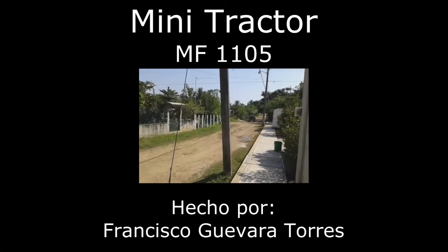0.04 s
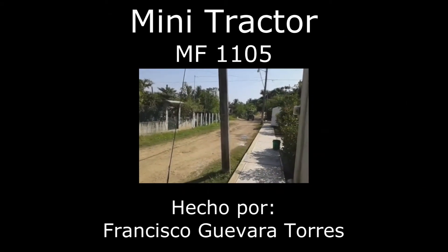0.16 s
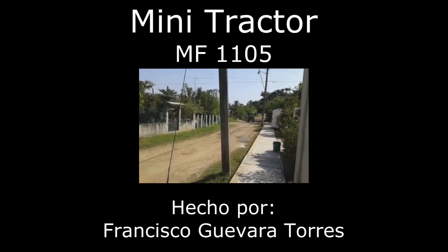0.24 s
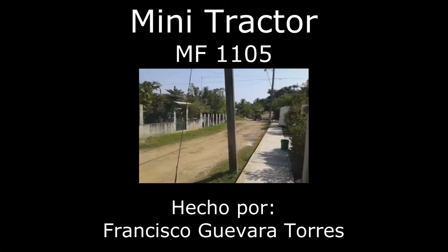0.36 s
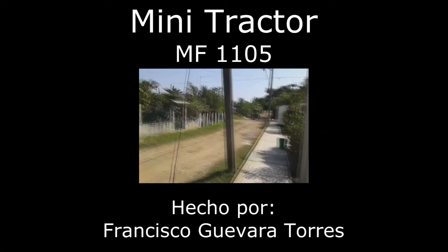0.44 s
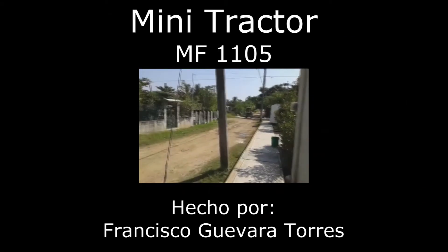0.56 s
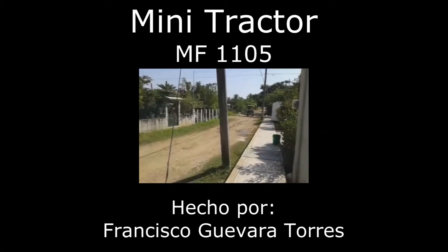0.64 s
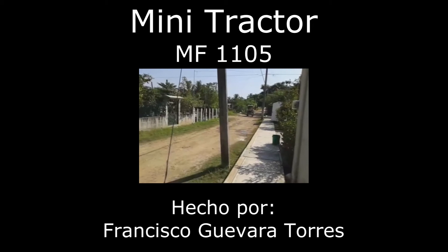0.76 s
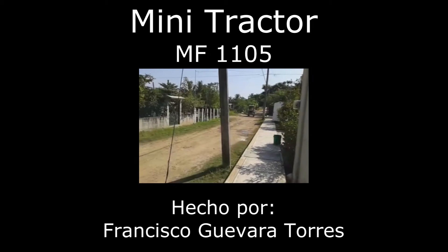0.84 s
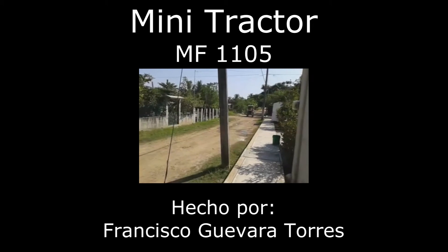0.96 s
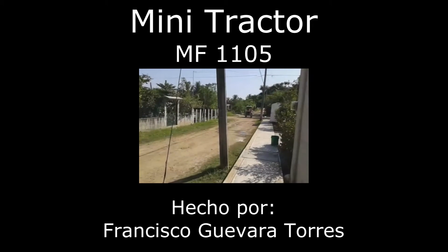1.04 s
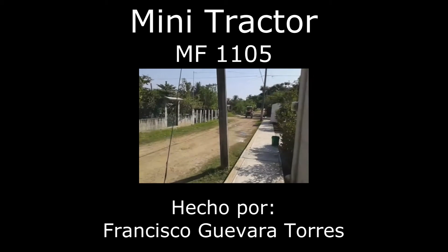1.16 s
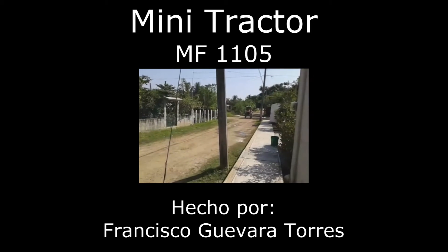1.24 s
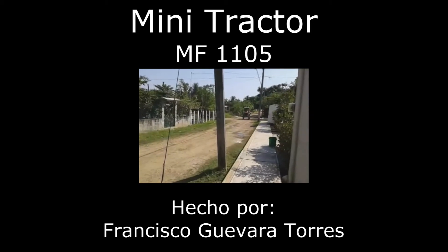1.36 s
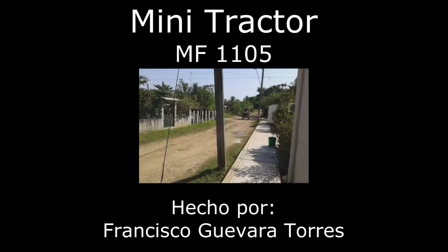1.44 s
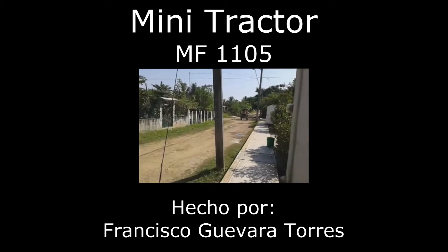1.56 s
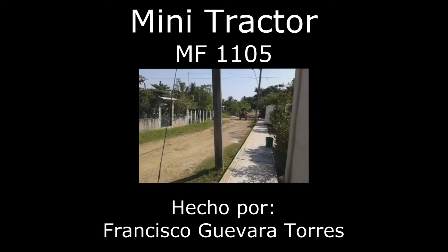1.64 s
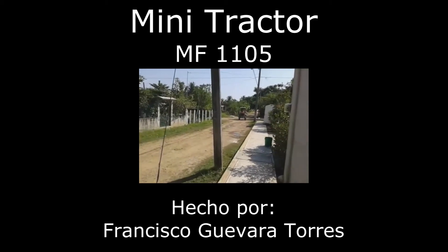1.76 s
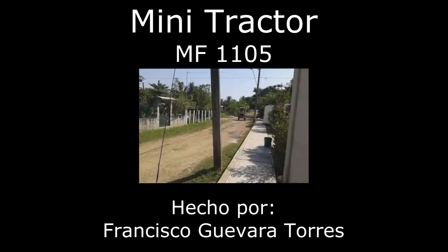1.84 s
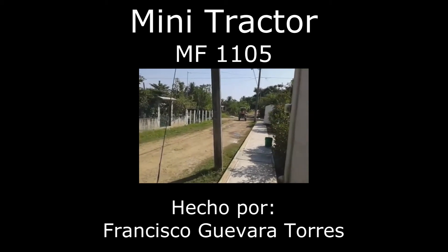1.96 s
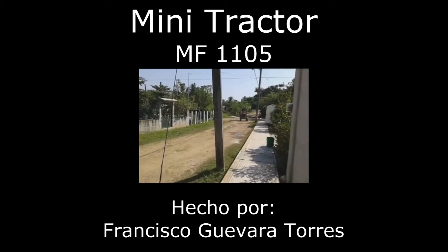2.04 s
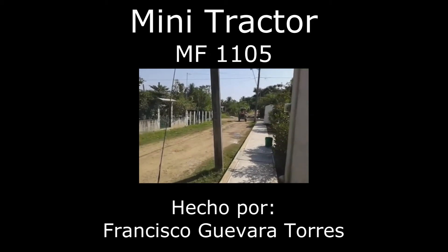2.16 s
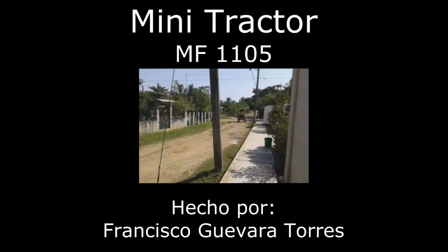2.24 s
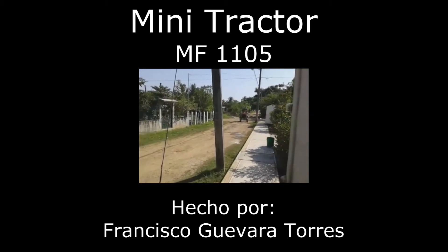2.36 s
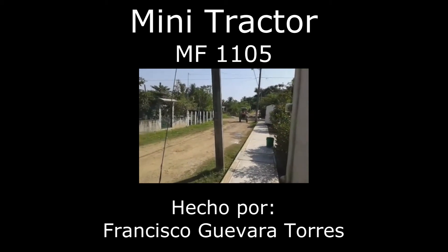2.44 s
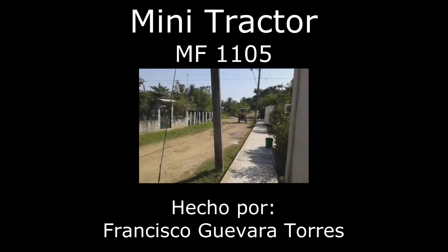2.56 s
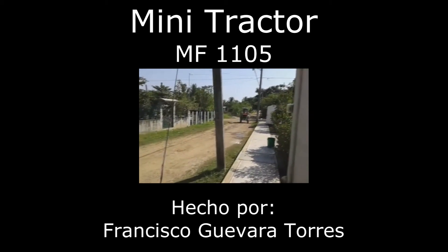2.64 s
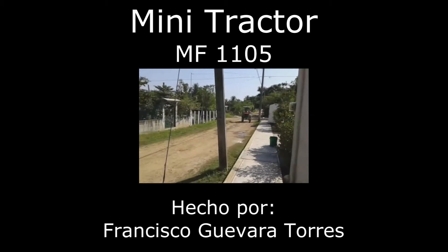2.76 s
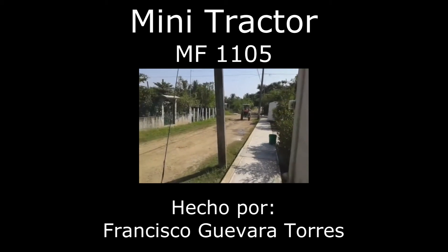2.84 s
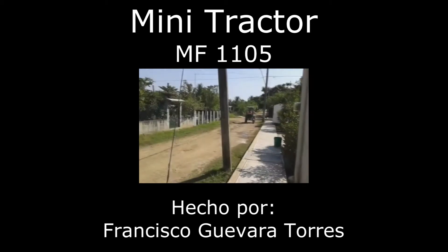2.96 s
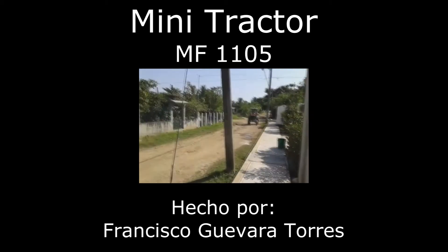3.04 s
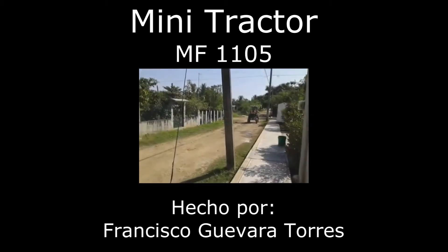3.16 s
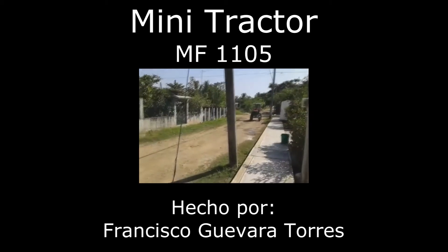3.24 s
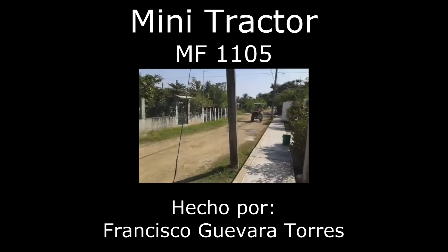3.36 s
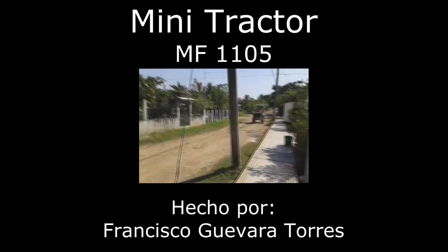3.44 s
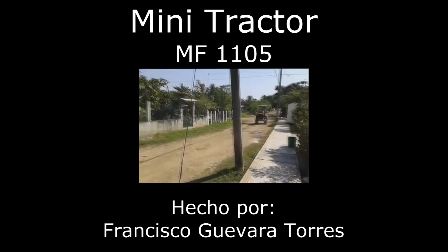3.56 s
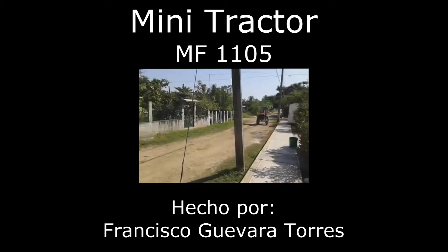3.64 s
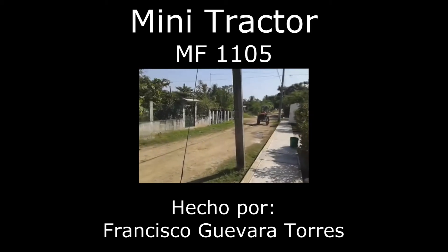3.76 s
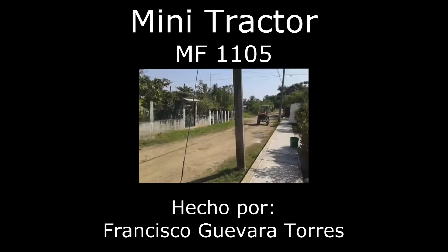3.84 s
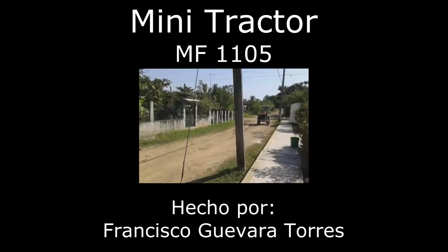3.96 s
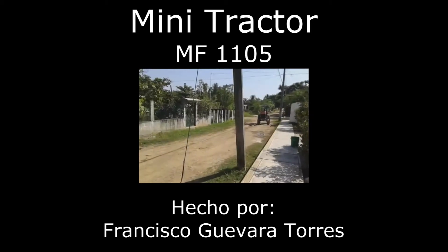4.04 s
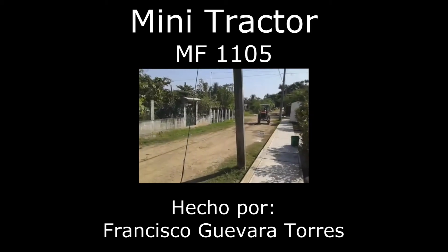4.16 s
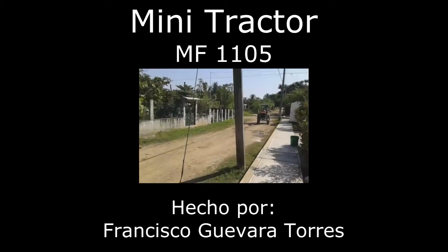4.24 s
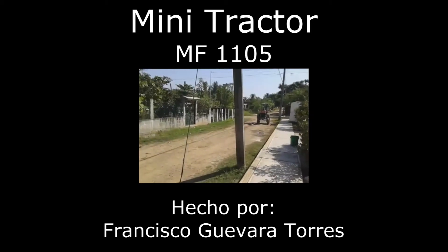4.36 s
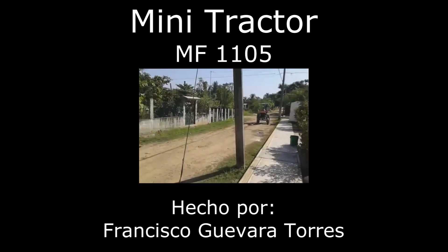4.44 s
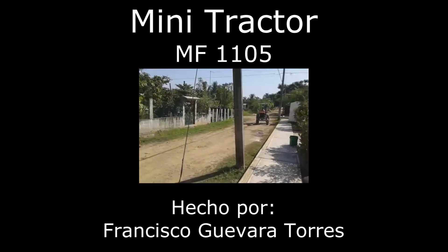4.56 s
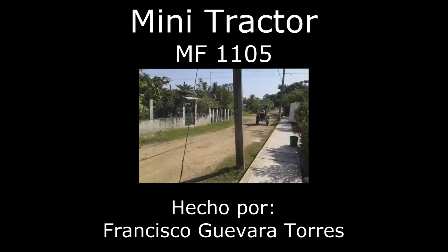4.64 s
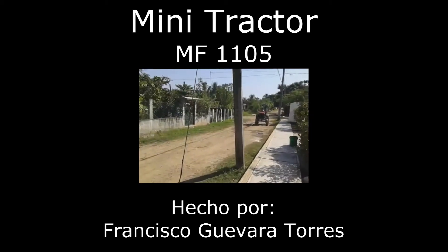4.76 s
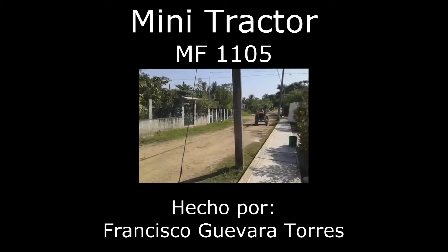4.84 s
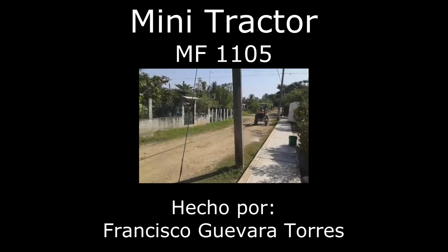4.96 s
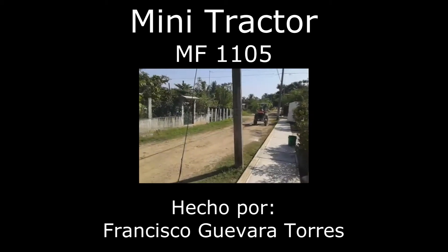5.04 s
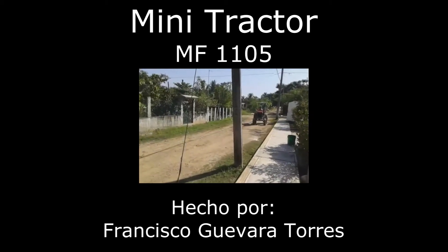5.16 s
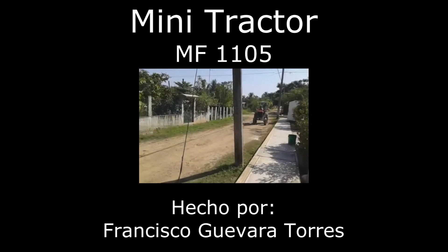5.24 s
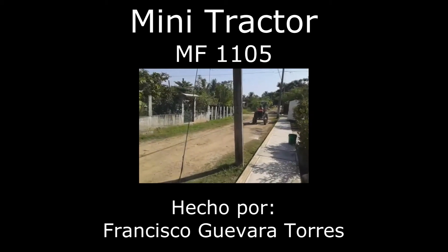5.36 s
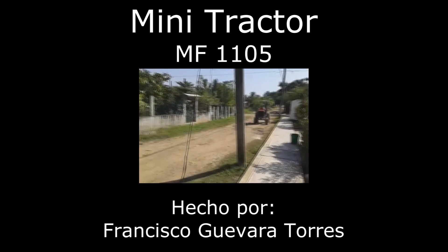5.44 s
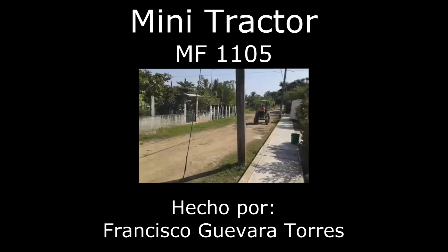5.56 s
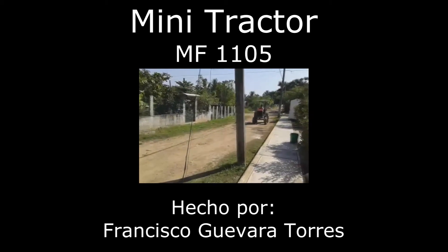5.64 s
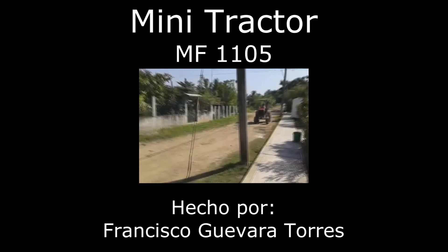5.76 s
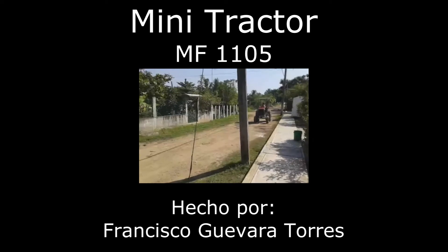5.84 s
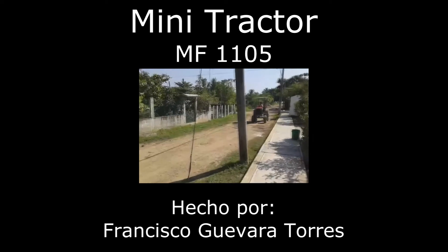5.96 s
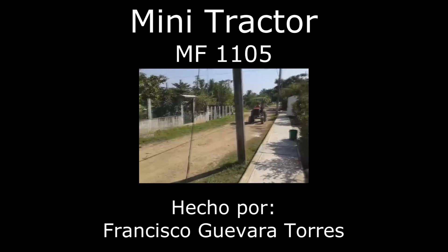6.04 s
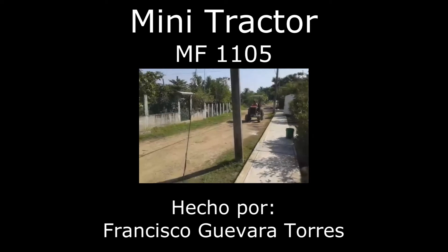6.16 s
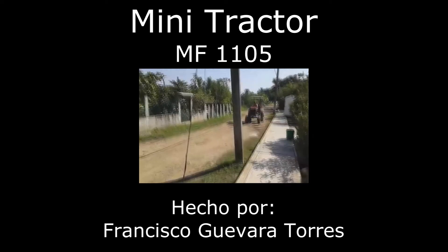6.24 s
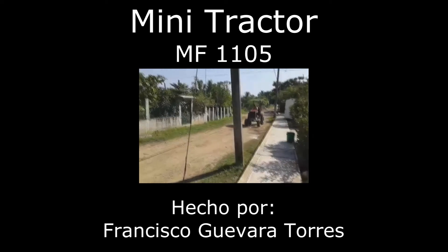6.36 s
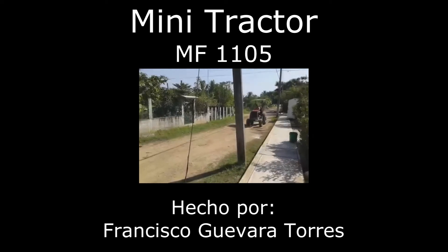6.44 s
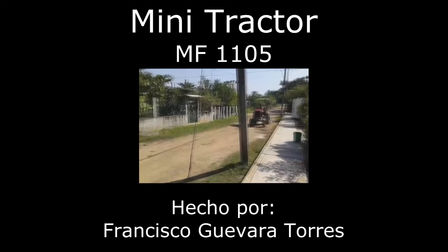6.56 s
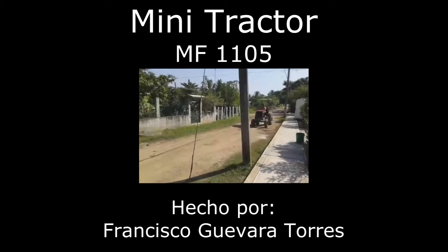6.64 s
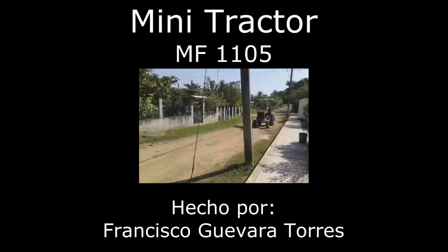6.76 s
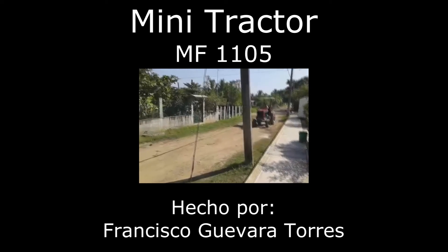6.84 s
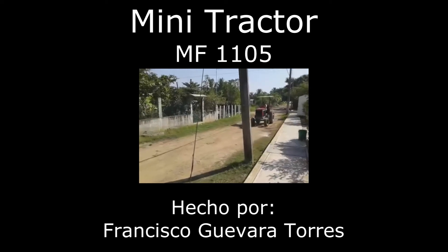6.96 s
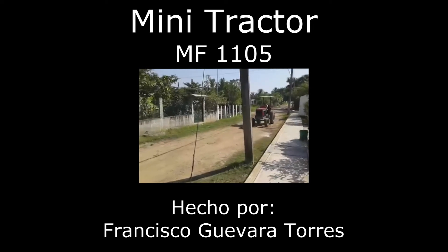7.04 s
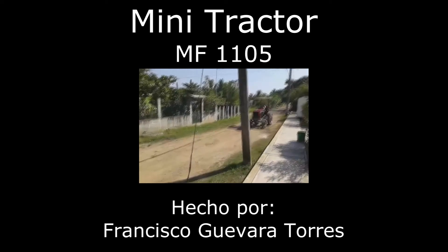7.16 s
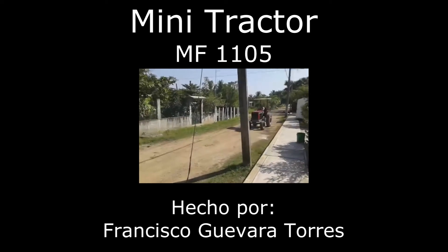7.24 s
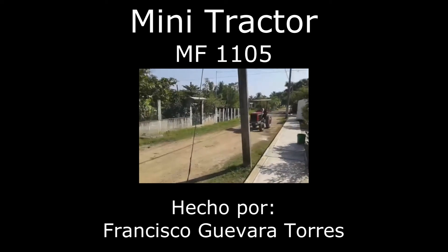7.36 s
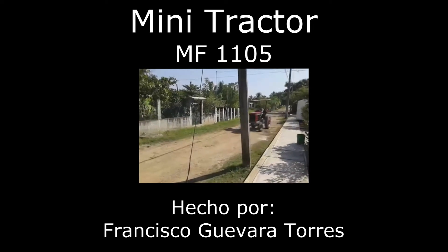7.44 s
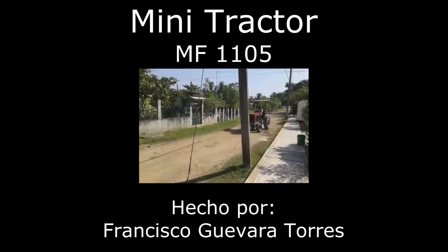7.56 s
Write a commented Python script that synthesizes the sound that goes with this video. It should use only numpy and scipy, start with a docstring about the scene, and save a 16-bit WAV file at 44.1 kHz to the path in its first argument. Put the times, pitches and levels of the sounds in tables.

```python
"""The four-cylinder car engine of a small home-built tractor, crawling up a dirt street towards us.
As the throttle wanders, the exhaust's harmonics slide through the muffler's boom and the uneven
cylinders burble; midway there is a short low thump as the engine suddenly gets louder.
The block clatters and knocks, the running gear hisses and squeals, loose metal rattles over the bumps.
Underneath, the wheels rumble on the dirt and a faint tone comes and goes."""
import sys
import numpy as np
from scipy import signal
from scipy.fft import rfft, irfft, next_fast_len
from scipy.io import wavfile
from scipy.ndimage import uniform_filter1d

SR = 44100
rng = np.random.default_rng(int(sys.argv[2]) if len(sys.argv) > 2 else 0)


def log_audio(samples):
    """Write samples as a 16-bit WAV file to the path given in sys.argv[1]."""
    # one column per channel
    frames = np.atleast_2d(samples).T
    # limit to full scale, then quantise
    limited = np.clip(frames, -1, 1)
    pcm = np.round(limited * 32767).astype(np.int16)
    wavfile.write(sys.argv[1], SR, pcm)


N = 335160
TIME = np.arange(N) / SR
CRUISE_HZ, MIDDLE_REVS_HZ, HIGH_REVS_HZ = 40, 45.5, 49.5  # firing rates
LOAD_START_S, LOAD_RISE_S = 3.39, 0.043
FAR_M, NEAR_M = 31.4, 16.7  # the colour crossfades from far to near between these distances

# The tractor's approach. Each row: time in seconds, distance in metres.
APPROACH = [(0, 41.7), (1.6, 43.3), (3, 29.6), (5, 26.6), (6.4, 19.9), (7.6, 20.6)]
# Wheels on dirt. Each row: frequency in Hz, relative level in dB.
RUMBLE_EQ = [(20, -30.5), (45, 0), (80, 17), (200, -5), (1000, -64)]
# Swells of the faint tone. Each row: centre in seconds, half length in seconds, level in dB.
TONE_SWELLS = [(2.8, 0.11, -52), (3.85, 0.09, -49)]
# Bumps that shake loose metal. Each row: start in seconds, relative rattle level in dB,
# rattle decay in seconds, crack level in dB.
BUMPS = [(0.027, -57, 0.03, -67), (0.137, -52.5, 0.0085, -69), (.273, -57, 0.014, -68),
         (.48, -56, 0.026, -65), (.606, -59, .01, -72), (1.05, -54, 0.023, -68), (1.168, -52.5, 0.015, -66),
         (1.259, -50.5, 0.017, -64), (1.331, -54, 0.015, -68), (1.74, -55, 0.016, -70),
         (1.879, -55, 0.015, -68), (2.339, -55, 0.021, -64), (2.435, -54, 0.018, -65),
         (2.565, -56, .015, -69), (2.646, -53, 0.016, -63), (4.139, -49, 0.06, -55),
         (5.726, -43.5, 0.043, -62), (5.83, -44, 0.017, -60), (5.847, -40.5, 0.024, -48),
         (6.162, -43, .03, -62), (6.225, -49, 0.17, -62), (6.318, -44, 0.018, -53),
         (6.677, -58, 0.018, -63), (6.771, -44.5, 0.023, -50), (6.89, -51, .25, -62),
         (6.972, -47, 0.022, -56), (7.057, -42, 0.011, -54), (7.092, -44.5, 0.086, -43),
         (7.205, -47.5, 0.16, -53), (7.367, -49, 0.013, -55), (7.523, -41.5, 0.043, -41.5)]
# Colour of the rattle and of its opening crack. Each row: frequency in Hz, relative level in dB.
RATTLE_EQ = [(600, -12.5), (1500, -5.5), (2800, -16), (3500, -6), (4000, -3.5), (4600, 1.5), (5300, 5.5),
             (6500, -6), (8000, -17), (11000, -23), (14000, -34)]
CRACK_EQ = [(2500, -15), (4500, 0), (8000, 4), (10500, -1.5), (14000, -9)]
# Ring of thin steel parts. Each row: frequency in Hz, width in Hz, relative level in dB.
STEEL_MODES = [(2427, 30, -24), (2840, 35, -23.5), (3594, 33, -19), (3935, 35, -14), (4090, 35, -17.5),
               (4320, 98, -14.5), (5100, 80, -12), (5465, 240, -8.5)]
# Notes of rubbing metal. Each row: centre in seconds, half length in seconds, pitch in Hz,
# pitch scatter in Hz, level in dB.
SQUEALS = [(3.45, 0.076, 5460, 130, -59), (3.6, 0.065, 5160, 90, -54), (3.73, 0.095, 5520, 80.3, -53),
           (3.76, .08, 4400, 80, -57), (3.9, 0.096, 5550, 139.7, -51.5), (3.99, 0.08, 4340, 111, -54.5),
           (4.13, .09, 4430, 90, -53.5), (4.14, 0.072, 5600, 119.6, -54), (4.75, 0.35, 3905, 70, -58.5),
           (5.42, 0.07, 4380, 100, -52), (6.037, .05, 5400, 110, -57), (6.33, 0.13, 5240, 303, -48),
           (6.56, .07, 5470, 111.6, -58)]
# Gear hiss and block clatter, from afar (the ground cancels 1 kHz) and close by.
# Each row: frequency in Hz, relative level in dB.
GEAR_FAR_EQ = [(1600, -35), (2700, -17), (3200, -10), (3530, -4), (3700, -7.5), (3970, 1), (4650, -5),
               (4950, -4.5), (5170, -5), (5700, -4), (6300, -9.5), (7000, -15), (8500, -23.5),
               (14000, -29.5)]
GEAR_NEAR_EQ = [(1600, -33), (2700, -13), (3600, -8), (3950, -7), (4350, 2), (4620, 0), (5100, 5.5),
                (5450, 2.5), (5950, 1.5), (6250, -5.5), (7000, -13), (8500, -20), (14000, -30.5)]
BLOCK_FAR_EQ = [(200, -14), (320, -5.5), (420, -5.5), (530, -5), (600, 1.5), (665, -4), (740, -0.5),
                (850, -1), (930, -7.5), (1050, -16), (1200, -8), (1400, -18), (2000, -45.5)]
BLOCK_NEAR_EQ = [(200, -20), (330, 6.5), (410, -0.5), (460, -0.5), (520, 2), (590, 1.5), (680, -1),
                 (750, -5), (860, -6), (1000, -7), (1200, -9.5), (1400, -27.5), (2000, -34.5)]
# The valve gear's bright edge. Each row: frequency in Hz, relative level in dB.
VALVE_EQ = [(600, -18), (1050, -5.5), (1200, -4), (1350, -1), (1700, 2), (1820, 1.5), (1920, 4.5),
            (2060, -0.5), (2280, -3), (2650, -5.5), (3400, -8), (5000, -19), (9000, -57)]
# Engine bay panels. Each row: frequency in Hz, width in Hz, relative level in dB, change close by in dB.
PANEL_MODES = [(369.7, 16, -12, 4), (461, 35, -12.5, 3), (735, 18, -7.5, -2.5), (782, 33, -15, 5.5),
               (847, 45, -11.5, -5.5), (1148, 55, -17, -3.5), (1233, 55, -17.5, 2)]
# Hard firings. Each row: centre in seconds, half length in seconds, resonance in Hz, level in dB.
HARD_FIRINGS = [(3.52, 0.0068, 830, -46), (3.812, 0.014, 810, -52), (3.891, .015, 820, -47),
                (4.003, .012, 480, -45), (4.061, 0.021, 1230, -50), (4.152, .025, 830, -53),
                (4.168, .012, 520, -46.5), (4.238, .012, 480, -45), (4.306, 0.025, 765, -44.5),
                (4.319, 0.019, 477, -44), (4.405, .012, 500, -43), (5.805, 0.011, 580, -43),
                (5.965, .006, 650, -44), (6.177, 0.036, 774, -47), (6.263, 0.02, 790, -45),
                (6.346, .009, 776, -40.5), (6.53, .013, 484, -42), (6.612, 0.012, 475, -42),
                (6.698, 0.0086, 556.6, -47), (6.933, .01, 520, -40), (7.012, .012, 460, -43),
                (7.246, .025, 707, -46.5), (7.326, .015, 1230, -48), (7.444, 0.01, 520, -42.5),
                (7.525, 0.012, 480, -41)]
# The thump's resonances. Each row: frequency in Hz, width in Hz, relative level in dB per pass.
THUMP_MODES = [(201, 31, 3.5), (611, 29, -24), (850, 30, -27)]
# Cylinders in firing order. Each row: exhaust pulse strength, lateness in firing periods, knock strength.
CYLINDERS = [(1.23, -0.014, 1.1), (0.72, 0.028, 0.15), (1.18, 0.116, 0.3), (0.7, -0.131, 0.6)]
# The wandering revs. Each row: time in seconds, firings per second.
REVS = [(0, 29.7), (.1, 32.9), (.3, 45.6), (.4, 47.8), (.6, 44.4), (.9, 37.6), (1, 32.9), (1.3, 37.8),
        (1.5, 39.2), (1.62, 36.6), (1.85, 36.5), (2, 39.8), (2.25, 38.1), (2.52, 38.8), (2.75, 46.5),
        (3.08, 45.9), (3.3, 37.8), (3.45, 36.5), (3.7, 43.3), (3.95, 47.3), (4.15, 49.4), (4.3, 50.7),
        (4.5, 47.7), (4.75, 40.9), (5.5, 38.9), (5.85, 36), (6.02, 38.2), (6.5, 49.9), (6.85, 50.2),
        (7.2, 44.9), (7.52, 49.9)]
# The exhaust's effort, stepping up as the throttle opens. Each row: time in seconds, level in dB.
EXHAUST_EFFORT = [(0, -38), (.2, -37.5), (.45, -39.5), (.8, -36.5), (1.1, -38), (1.3, -35), (1.65, -37),
                  (1.95, -34), (2.6, -33), (2.85, -36.5), (3.39, -32), (3.42, -27.5), (3.48, -31),
                  (3.53, -26), (3.99, -26.5), (4.05, -30), (4.1, -26.5), (4.5, -27), (5.3, -25), (5.75, -26),
                  (6.35, -26), (6.7, -29.2), (7.15, -23.5), (7.6, -25)]
# The muffler's filtering of the burble. Each row: frequency in Hz, relative gain in dB.
MUFFLER_EQ = [(30, -73), (60, -48), (90, -9.5), (120, -2), (150, 7.5), (180, 5.5), (215, 6.5), (245, 1.5),
              (275, -12), (320, -18.5), (400, -34), (700, -63)]
# Partials from the unequal cylinders. Each row: multiple of the four-stroke cycle rate,
# then relative level in dB ahead of the muffler at cruise, at middle revs and at high revs.
BURBLE_PARTIALS = [(9, -15, -14, -7), (10, -4, -6, -0.5), (11, -19, -2, -6), (13, -5.5, -0.5, -3),
                   (14, -12.5, 2, -4.5), (15, -7.5, 1.5, -3.5), (17, -11.5, -6, -1), (18, 2.5, -0.5, -2.5),
                   (19, -1.5, -0.5, -1.5), (20, 0, -7.5, -5), (21, -10.5, -10, -2.5), (22, -8.5, -2, 3),
                   (23, -10, 0, 1.5), (24, -1.5, 1.5, 5), (25, -8.5, -1.5, 2), (26, -1.5, -15, -14),
                   (27, -6, -5, -5), (28, -6, -6, 4.5), (31, -6.5, -3, -5), (32, 2, -5, -4)]
# How ragged the burble is. Each row: time in seconds, irregular share from 0 to 1.
RAGGEDNESS = [(0, 0.22), (1.2, 0.18), (2.4, 0.29), (3.5, 0.27), (4.3, 0.18), (4.8, 0), (5.7, 0.04),
              (6.3, 0.12), (7.6, 0.11)]
# The burble's level changes with the revs, dipping as the drone's third harmonic reaches the pipe's boom. Each
# row: firings per second, relative level in dB.
BURBLE_BY_REVS = [(32, -4.5), (37, 0), (40, 0), (46, -2), (50, -1.5)]
# Exhaust partials bloom or drop out. Each row: multiple of the four-stroke cycle rate,
# centre in seconds, half length in seconds, boost or cut in dB.
PARTIAL_SWINGS = [(8, 4.05, .07, -17), (8, 4.85, 0.24, -6), (8, 6.42, 0.15, 6.5), (12, 0.42, 0.12, 5),
                  (12, 1.27, 0.11, 6.5), (12, 1.6, 0.063, -3), (12, 1.75, 0.25, 5.5), (12, 2.27, 0.21, -8),
                  (12, 2.956, 0.23, 6), (12, 3.86, 0.072, 7), (12, 4.256, 0.42, -7.5), (12, 4.81, 0.16, 2),
                  (12, 5.72, 0.46, -4.5), (12, 6.4, 0.16, -0.5), (12, 6.76, 0.21, 7),
                  (12, 7.16, 0.16, -0.5), (12, 7.52, 0.14, 3.5), (14, 4.18, 0.36, -10), (15, 4.25, .25, 1),
                  (16, 0.86, .13, 4.5), (16, 1.47, 0.084, 3.5), (16, 1.7, .1, -2), (16, 3.74, 0.28, -7),
                  (16, 4.14, .25, 3), (16, 4.7, 0.15, -2.5), (16, 7.1, 0.081, 3.5), (16, 6.47, 0.22, -3.5),
                  (16, 7.17, 0.23, -15), (18, 1.28, 0.81, -11), (19, 3.08, 0.35, -7), (20, 1.47, .4, 4),
                  (20, 2.3, .25, 4), (20, 4.7, 0.19, 5), (24, 3.38, 0.24, 8), (25, 3.45, 0.27, 7),
                  (26, 1.2, .7, -8)]
# The tailpipe, with its boom near 150 Hz. Each row: frequency in Hz, gain in dB.
PIPE_EQ = [(65, -21.5), (80, -17.5), (98, -8), (112, -10.5), (118, -11), (125, -6), (137, -1.5), (150, 1),
           (160, 1), (172, -1), (183, -5.5), (197, -3.5)]
# The drone's harmonics. Each row: multiple of the firing rate, relative level in dB ahead of the pipe,
# change under load in dB.
FIRING_HARMONICS = [(1, -25.5, -3), (2, -4.5, -2.5), (3, 0.5, -.5), (4, -5.5, 2.5)]


def from_db(db):
    """Decibels to gain."""
    return 10 ** (np.asarray(db) / 20)


def rms_one(x):
    """Scale to unit power."""
    return x / np.sqrt(np.mean(x ** 2) + 1e-20)


def levelled(x, size=8000):
    """Hold unit power over a window of size samples, keeping any faster throb."""
    return x / np.sqrt(uniform_filter1d(x ** 2, size) + 1e-12)


def curve(rows, at=TIME):
    """Read a breakpoint curve, by default along the timeline."""
    return np.interp(at, *np.transpose(rows))


def noise():
    """White noise."""
    return rng.standard_normal(N)


def drift(rate):
    """Random modulation of spread 1, turning rate times a second."""
    knots = rng.standard_normal(8192)
    return rms_one(np.interp(TIME * rate, np.arange(len(knots)), knots))


def swell(centre, half_length):
    """A smooth flat-topped envelope of height 1."""
    return np.exp(-((TIME - centre) / half_length) ** 4)


def hit(age, rise_s, decay_s):
    """A percussive envelope: quick attack, exponential tail."""
    return (1 - np.exp(-age / rise_s)) * np.exp(-age / decay_s)


def coloured(x, eq):
    """Minimum-phase EQ, returned at unit power."""
    size = 2 * next_fast_len(N // 2 + SR // 4)
    hz, db = np.transpose(eq)
    grid = np.maximum(np.fft.rfftfreq(size, 1 / SR), 1)
    gain = from_db(np.interp(np.log(grid), np.log(hz), db))
    cepstrum = irfft(np.log(gain))
    cepstrum[1:size // 2] *= 2
    cepstrum[size // 2 + 1:] = 0
    return rms_one(irfft(rfft(x, size) * np.exp(rfft(cepstrum)))[:N])


def approaching(x, far_eq, near_eq, nearness):
    """Crossfade from the far colour to the near one."""
    return (1 - nearness) * coloured(x, far_eq) + nearness * coloured(x, near_eq)


def resonate(x, modes):
    """Parallel resonances, each at its own level."""
    return sum(from_db(db) * rms_one(signal.lfilter(*signal.iirpeak(hz, hz / width, fs=SR), x))
               for hz, width, db in modes)


def steady_ring(modes):
    """Noise passed twice through resonances, then levelled."""
    return levelled(resonate(resonate(noise(), modes), modes), size=900)


def engine_load():
    """Load from 0 to 1: it climbs quickly midway, then holds."""
    return 1 - np.exp(-np.maximum(TIME - LOAD_START_S, 0) / LOAD_RISE_S)


def lift_db(firing_hz, approach, load_db, db_per_hz):
    """A part gets louder with closeness, load and revs; approach scales the distance gain."""
    distance_m = curve(APPROACH)
    closer_db = 20 * np.log10(distance_m[0] / distance_m)
    return approach * closer_db + load_db * engine_load() + db_per_hz * (firing_hz - CRUISE_HZ)


def firing_noise(firings, depth, decay):
    """Noise that flares at each firing, as hard as its cylinder knocks; decay is in firing periods."""
    strength = np.array(CYLINDERS)[firings.astype(int) % len(CYLINDERS), 2]
    return noise() * (1 + depth * strength * np.exp(-(firings % 1) / decay))


def wheel_rumble(nearness):
    """Wheels on dirt lay a low bed that grows as they near."""
    return from_db(-63.5 + 20.6 * nearness ** 2 + drift(2.8)) * coloured(noise(), RUMBLE_EQ)


def faint_tone(hz=384):
    """A nearly steady tone comes and goes."""
    level = sum(from_db(db) * swell(s, half_length) for s, half_length, db in TONE_SWELLS)
    return level * np.sin(2 * np.pi * np.cumsum(hz + 1.3 * drift(11.16)) / SR)


def rattles():
    """Each bump starts with a bright crack, then a shower of tiny metal contacts rings the steel."""
    shake, strike = np.zeros((2, N))
    for s, rattle_db, decay_s, crack_db in BUMPS:
        start = int(s * SR)
        age = TIME[:N - start][:SR // 2]
        span = slice(start, start + len(age))
        shake[span] += from_db(rattle_db + 6) * hit(age, rise_s=0.0037, decay_s=decay_s)
        strike[span] += from_db(crack_db) * hit(age, rise_s=0.0027, decay_s=0.017)
    contacts = coloured(noise() * from_db(2 * drift(500)), RATTLE_EQ)
    steel = from_db(-1) * resonate(coloured(noise(), RATTLE_EQ), STEEL_MODES)
    crack = coloured(noise() * from_db(4.5 * drift(800)), CRACK_EQ)
    return shake * rms_one(contacts + steel) + strike * crack


def squeals():
    """Rubbing metal sings in short rough notes."""
    notes = 0
    for s, half_length, hz, scatter_hz, db in SQUEALS:
        tone = np.sin(2 * np.pi * np.cumsum(hz + scatter_hz * drift(700)) / SR)
        notes += from_db(db) * swell(s, half_length) * tone
    flutter = from_db(3.8 * drift(120))
    return np.sqrt(2) * notes * flutter


def running_gear(firing_hz, firings, nearness):
    """Grainy hiss of rubbing metal that rings in thin steel parts."""
    grains = firing_noise(firings, depth=0.22, decay=0.94) * from_db(1.3 * drift(450) + 1.1 * drift(25))
    rings = sum(resonate(noise(), [mode]) * from_db(2 * drift(6)) for mode in STEEL_MODES)
    rings = signal.sosfilt(signal.butter(2, [2300, 6500], "band", fs=SR, output="sos"), rings)
    rings *= from_db(-3 * nearness)  # the ringing stands out most from afar
    hiss = approaching(grains, GEAR_FAR_EQ, GEAR_NEAR_EQ, nearness)
    level_db = -59.35 + lift_db(firing_hz, approach=1.18, load_db=7, db_per_hz=0.03)
    return from_db(level_db) * (hiss + rings)


def clatter(firing_hz, firings, nearness):
    """Combustion knock in the block and its panels, throbbing more close by; valve gear on top."""
    throb = 0.27 + 0.7 * np.sqrt(nearness)
    block = approaching(firing_noise(firings, throb, decay=0.5), BLOCK_FAR_EQ, BLOCK_NEAR_EQ, nearness)
    block *= from_db(-0.3 - 1.1 * nearness)
    modes = [(hz, width, db + near_db * nearness) for hz, width, db, near_db in PANEL_MODES]
    panels = resonate(coloured(firing_noise(firings, throb, decay=0.22), BLOCK_FAR_EQ), modes)
    valves = coloured(firing_noise(firings, depth=0.2, decay=0.85), VALVE_EQ)
    block_db = -56 + lift_db(firing_hz, approach=0.4735, load_db=6, db_per_hz=0.1632) + 0.5 * drift(16)
    valve_db = -67 + lift_db(firing_hz, approach=1.4444, load_db=6, db_per_hz=0.11) + 1.24 * drift(22)
    return from_db(block_db) * (block + panels) + from_db(valve_db) * valves


def hard_knocks(width_hz=81):
    """Hard firings each ring one throaty resonance of the engine."""
    return sum(from_db(db) * swell(s, half_length) * steady_ring([(hz, width_hz, 0)])
               for s, half_length, hz, db in HARD_FIRINGS)


def thump(start_s=3.41):
    """A short low thump as the engine suddenly gets louder."""
    age = np.maximum(TIME - start_s, 0)
    return from_db(-18.5) * hit(age, rise_s=0.0067, decay_s=0.02) * steady_ring(THUMP_MODES)


def swing_db(order):
    """Passing blooms and dips of the partial at order times the firing rate."""
    return sum(db * swell(s, half_length) for multiple, s, half_length, db in PARTIAL_SWINGS
               if multiple == order * len(CYLINDERS))


def exhaust_partial(firings, order, wander=0):
    """One partial, phased by the cycle's four pulses so that the partials add up to puffs."""
    strength, late, _ = np.transpose(CYLINDERS)
    pulse_times = np.arange(len(CYLINDERS)) + late
    phase = np.angle(np.sum(strength * np.exp(-2j * np.pi * order * pulse_times)))
    lead = np.pi / 2 * (order % 2 == 1)  # odd harmonics lead, which rounds the puffs
    return np.cos(2 * np.pi * (order * firings + wander) + phase + lead)


def burble(firing_hz, firings):
    """Unequal cylinders add partials around the drone's; chance in each combustion fills the gaps."""
    ragged = curve(RAGGEDNESS)
    partials = 0
    for multiple, *levels_db in BURBLE_PARTIALS:
        order = multiple / len(CYLINDERS)
        db = np.interp(firing_hz, [CRUISE_HZ, MIDDLE_REVS_HZ, HIGH_REVS_HZ], levels_db)
        db += curve(MUFFLER_EQ, order * firing_hz) + swing_db(order)
        wander = (0.027 + 0.45 * ragged) * drift(9)
        partials += from_db(db) * exhaust_partial(firings, order, wander)
    pulses = np.diff(np.floor(firings), prepend=0) * noise()
    turbulence = 0.043 * noise()  # gas flowing between the pulses
    sputter = levelled(coloured(pulses + turbulence, MUFFLER_EQ), size=2000)
    puffs = np.sqrt(1 - ragged) * levelled(partials) + np.sqrt(ragged) * sputter
    # the muffler's chamber buffers the gas, so strong and weak puffs come out more alike
    puffs /= uniform_filter1d(puffs ** 2 + 0.059, size=600) ** (1 / 3)
    return from_db(curve(BURBLE_BY_REVS, firing_hz)) * levelled(puffs, size=2200)


def exhaust_drone(firing_hz, firings):
    """Clean firing harmonics swell as they cross the pipe's resonance."""
    drone = 0
    for order, db, load_db in FIRING_HARMONICS:
        level_db = db + load_db * engine_load() + curve(PIPE_EQ, order * firing_hz)
        level_db += 1.44 * drift(12) + swing_db(order)
        drone += from_db(level_db) * exhaust_partial(firings, order)
    return np.sqrt(2) * drone


def scene():
    """The mono mix: one running count of firings keeps exhaust, clatter and hiss in step."""
    firing_hz = curve(REVS)
    firings = np.cumsum(firing_hz) / SR - 0.908  # start just under a period ahead of firing zero
    nearness = np.clip((FAR_M - curve(APPROACH)) / (FAR_M - NEAR_M), 0, 1)
    exhaust = exhaust_drone(firing_hz, firings) + burble(firing_hz, firings)
    exhaust *= from_db(curve(EXHAUST_EFFORT))
    metal = clatter(firing_hz, firings, nearness) + running_gear(firing_hz, firings, nearness)
    metal += squeals() + rattles()
    return (wheel_rumble(nearness) + metal + exhaust + thump() + hard_knocks() + faint_tone())[None]


def record(dry, fade_s=0.003, cutoff_hz=14000):
    """Brief fades at both ends and a steep high cut."""
    fade = np.minimum(np.minimum(TIME, TIME[-1] - TIME) / fade_s, 1)
    high_cut = signal.ellip(12, 0.1, 80, cutoff_hz, fs=SR, output="sos")
    return signal.sosfilt(high_cut, dry * fade)


dry = scene()
out = record(dry)
log_audio(out)
```